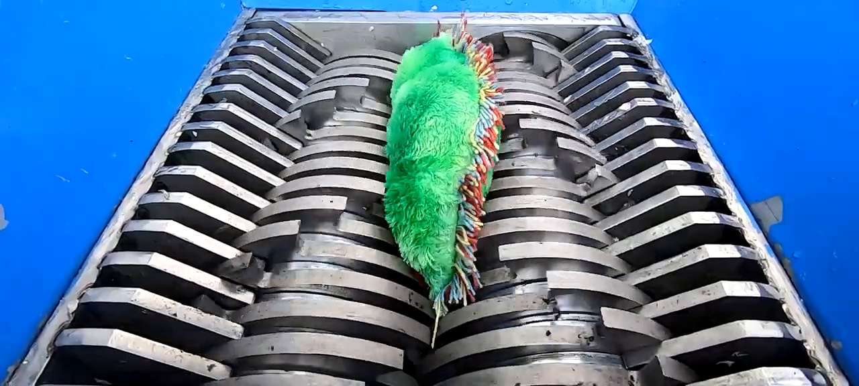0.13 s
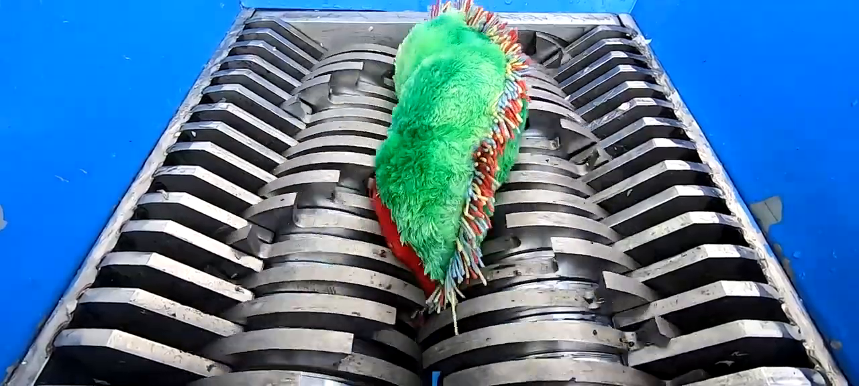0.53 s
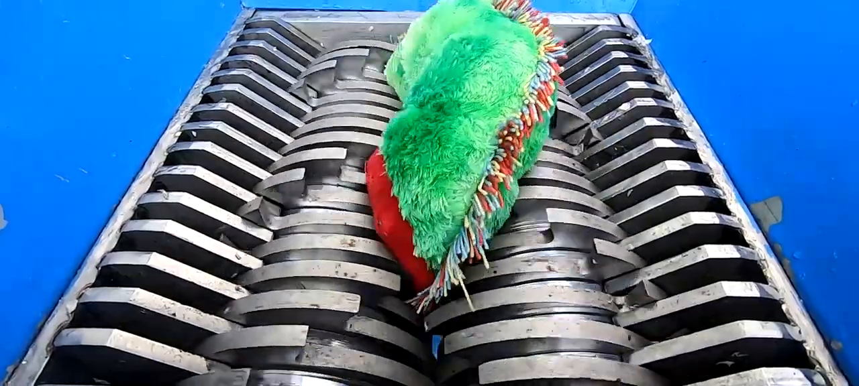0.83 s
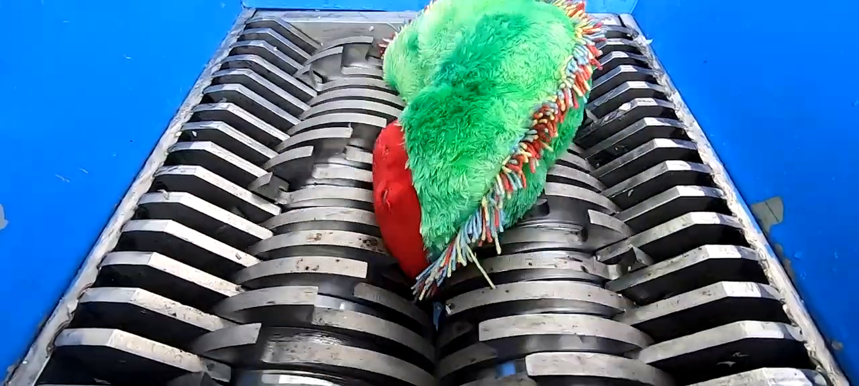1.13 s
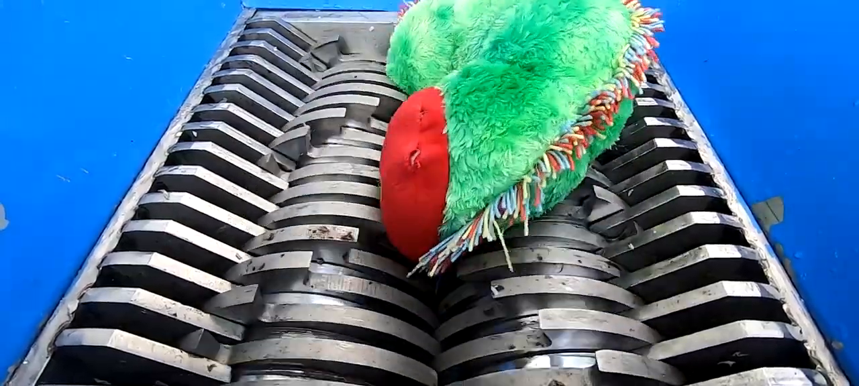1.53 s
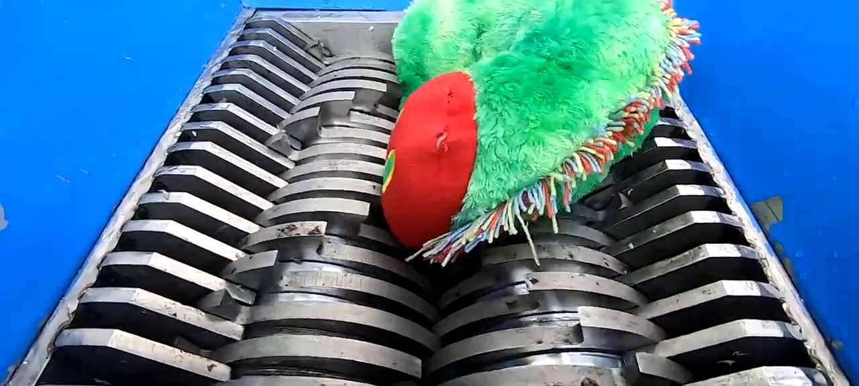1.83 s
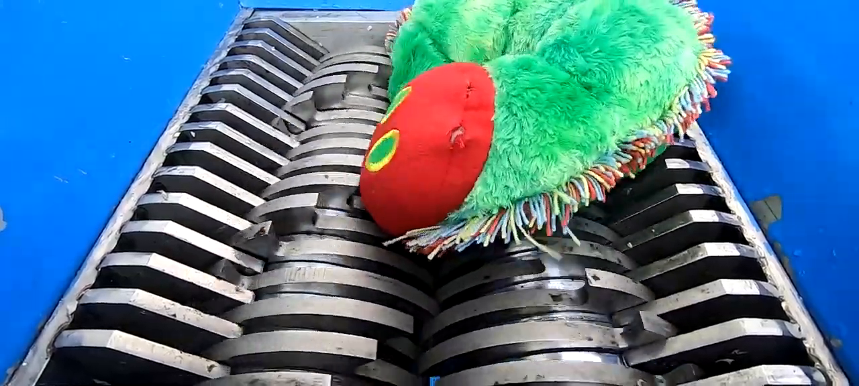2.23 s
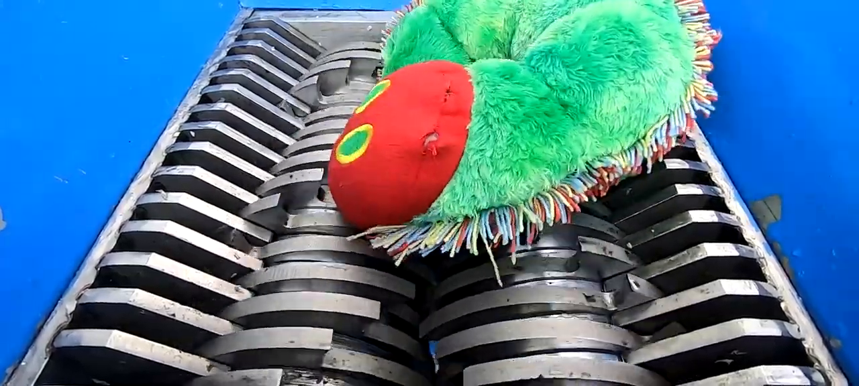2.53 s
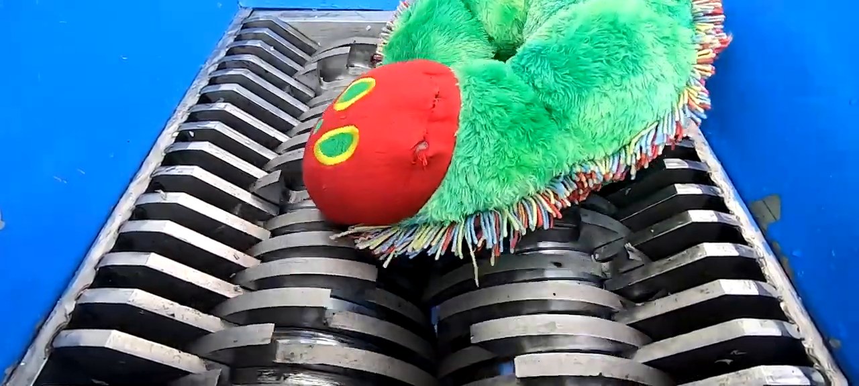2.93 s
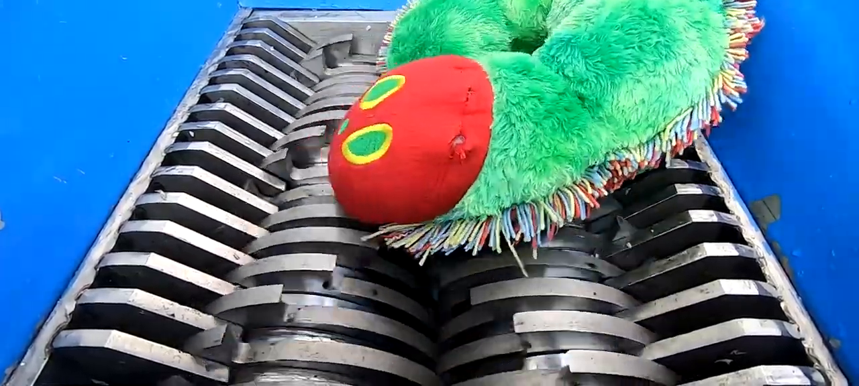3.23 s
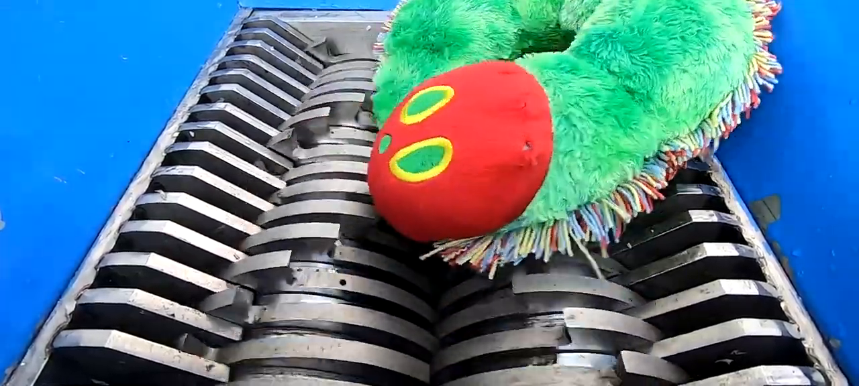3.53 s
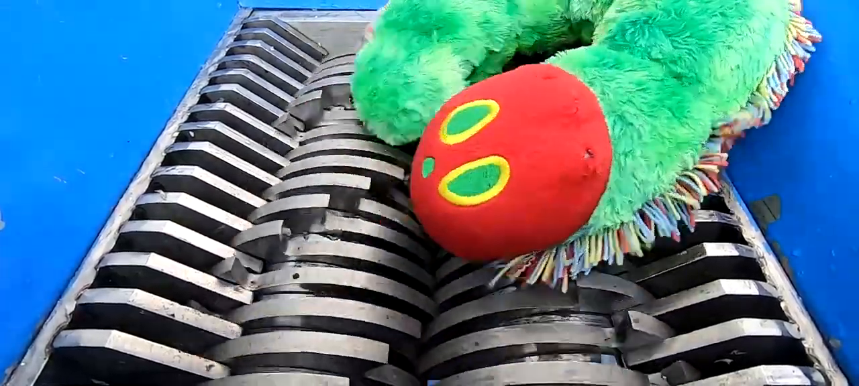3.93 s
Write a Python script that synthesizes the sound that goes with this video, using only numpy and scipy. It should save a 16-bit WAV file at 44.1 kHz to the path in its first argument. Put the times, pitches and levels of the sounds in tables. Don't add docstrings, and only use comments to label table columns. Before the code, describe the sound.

Low mechanical rumble of a twin-shaft shredder, with fabric crunches, a groaning surge midway, then heavier metallic knocks over a faint high whine.

```python
import sys
import numpy as np
from scipy import signal
from scipy.fft import rfft, irfft, next_fast_len
from scipy.io import wavfile
from scipy.ndimage import uniform_filter1d, map_coordinates

SR = 44100
rng = np.random.default_rng(int(sys.argv[2]) if len(sys.argv) > 2 else 0)


def attenuation_scalar(level_db):
    decades = np.asarray(level_db, float) / 20
    return 10 ** decades


def store_pcm(level_fs):
    pcm = np.round(np.clip(level_fs, -1, 1) * 32767).astype(np.int16)
    wavfile.write(sys.argv[1], SR, np.atleast_2d(pcm).T)


N = 180501

# t/s, second order f/Hz, second order level/dB, first over second order level/dB
GEAR_MESH = [(0, 69.5, -35, -1), (.36, 67.7, -34, -1.5), (.43, 68, -26, -13), (.64, 68, -29.5, -9.5),
             (1.36, 69.3, -23.5, -13), (1.43, 69.2, -37, 5), (1.5, 69, -22, -10.5), (1.65, 70.2, -35, 3.5),
             (1.88, 69.2, -19, -12), (2.12, 69.3, -17.5, -3.5), (2.3, 67.6, -28.5, -6),
             (2.41, 63.5, -29.5, 4.5), (2.64, 65.3, -29, -12.5), (2.76, 67, -37.5, -4.5),
             (3.2, 70.5, -40, -1), (3.27, 69.4, -25, -11.5), (3.88, 69.3, -31, -10),
             (4.03, 69.3, -28, -14.5)]
# mesh order, level/dB re the first two
UPPER_ORDERS = [(3, -10.5), (4, -12.5), (5, -12.5), (6, -10.5), (7, -15.5), (8, -26), (9, -14)]

# t/s, strain level/dB, bending over twisting level/dB
FRAME_LOAD = [(0, -28.5, 8), (.2, -29, 2.5), (.36, -27, -1.5), (.72, -30.5, -13.5), (.8, -24.5, 9),
              (.94, -33, -4.5), (1.06, -29.5, 1.5), (1.3, -35.5, -6), (1.46, -27.5, -12), (1.54, -21, 4),
              (1.83, -23, 10), (1.92, -24, -3), (2.37, -21.5, 2.5), (2.63, -24, 3.5), (2.71, -35.5, 6.5),
              (3.2, -34, 2), (3.27, -28.5, 9.5), (3.5, -30.5, -2.5)]
# t/s, f/Hz
BEAM_MODE = [(0, 123.5), (1.4, 125.4), (2, 131), (2.6, 138), (2.9, 123.7), (4.1, 124.7)]
# t/s, f/Hz
WALL_MODE = [(0, 155.7), (1.3, 157.4), (1.6, 169.7), (4.1, 167.4)]
# f/Hz, level/dB per Hz
RUMBLE_SPECTRUM = [(12, -22), (20, -22.5), (54, -5), (81, 0.5), (112, -1), (161, -4), (211, -8), (307, -12),
                   (359, -15), (409, -14.5), (620, -19.5), (810, -53.5), (1360, -120)]

# t/s, pressure level/dB, brightness level/dB
DISC_RUB = [(0, -35, 1), (.22, -32, 0.4), (.48, -36, -0.1), (.8, -37, -1), (1.18, -38, -2), (1.5, -37, -2),
            (1.8, -36, -0.4), (1.93, -28.5, 4.5), (2.08, -26, 4), (2.22, -32, 0.8), (2.42, -32.5, -4.5),
            (2.62, -30.5, 0.5), (2.72, -36.5, -1), (3.18, -37, -1), (3.5, -36.5, 1.5), (3.8, -38, 0.5),
            (4.09, -33, 3)]
# t/s, level/dB, high over low plate level/dB, lean (1 swells and stops, -1 fades)
HOOK_STRIKES = [(.069, -54, 5, -0.27), (.368, -37.5, -18, -0.36), (.551, -42, -26, -0.054),
                (.715, -37, -8, 0.41), (.965, -44.5, 5, 0.083), (1.333, -46, -7, 0.56),
                (1.444, -57, 11, .1), (1.539, -37, -7, 0.76), (1.7, -32, -20, .8),
                (1.785, -39.5, -10.5, .3), (1.954, -30, 5, 0.035), (2.131, -31, 5.2, -0.77),
                (2.289, -32, 2, 1), (2.402, -33, -30, -0.51), (2.457, -35.5, -23, -.4),
                (2.619, -47.5, 14, 0.36), (2.765, -30, -7, -0.36), (2.882, -50, 15.5, 1),
                (2.988, -32.5, -1.5, 0.93), (3.161, -26, -2.5, 0.44), (3.278, -28.5, -28, -0.24),
                (3.321, -33, 0, 0.23), (3.343, -28, -1.5, -0.22), (3.534, -22.5, -5, 0.12),
                (3.705, -36, 0.3, -0.046), (3.723, -25, -3.5, -0.07), (3.906, -25.5, -4, 0.28),
                (4.083, -40, -5, 0.023)]
# t/s, crunch level/dB, tick over crunch level/dB, lean
TOOTH_BITES = [(.069, -28, -15, 0.41), (.188, -32, -19, 0.48), (.267, -47.5, -1.5, -0.35),
               (.368, -39.5, 1.5, -.2), (.715, -49, -4.5, 0.032), (.82, -53, 2, 0.13), (1.174, -56, 7, .1),
               (1.333, -62, 9, 0.13), (1.444, -60, 12, 0.0028), (1.545, -42, -2, 0.71),
               (1.785, -45.5, -8, .2), (1.871, -38.5, -25, -0.59), (1.94, -40, -8.5, 0.37),
               (2.131, -36.5, -13.5, -0.62), (2.214, -29.5, -22, 1), (2.302, -36.5, -7, -0.29),
               (2.619, -46, -7.5, 0.45), (2.758, -40, -6, -.2), (2.882, -32.5, -23, .9),
               (2.965, -56, 15, -.3), (2.988, -45, -3, 1), (3.161, -33.5, -20.5, -0.69),
               (3.278, -40.5, -31, -1.5), (3.321, -33, -19.5, -0.25), (3.343, -37.5, -12.5, -0.24),
               (3.389, -33.5, -5.5, 0.91), (3.705, -30.5, -20, 0.034), (3.723, -41, -9.5, -0.092),
               (3.888, -40, -12, 0.15), (4.083, -37, -9.5, -0.22)]
# f/Hz, width/Hz, level/dB
LOW_PLATE_MODES = [(646, 47.6, -6.5), (680.7, 34.5, -1), (769.3, 35.4, -4)]
HIGH_PLATE_MODES = [(1564, 28, 4), (1644, 13, 6), (1200, 7, -6), (2310, 12, -1), (2206, 210, -10.5)]
# f/Hz, level/dB per Hz
SCRAPE_SPECTRUM = [(300, -39), (450, 0.5), (800, 0), (1100, -1), (1500, -7), (2000, -11), (2600, -48.5)]
DUST_SPECTRUM = [(1500, -37.5), (2000, 2.5), (2600, 1.5), (3100, -7), (3600, -7.5), (4100, -4), (4500, -15),
                 (5600, -26), (6300, -44.5), (7500, -38)]

# t/s, level/dB, centre f/Hz, swell/s (below 0 strikes and fades)
FABRIC_LUMPS = [(.04, -38.5, 1300, 0.014), (.075, -37, 1084, 0.01), (.19, -37, 1200, -0.00077),
                (1.59, -36.5, 693, 0.053), (2.04, -20.5, 404, 0.017), (2.222, -26, 870, -0.006),
                (2.393, -20, 560, -.02), (2.638, -26, 420, .012), (2.46, -24, 406, 0.0045),
                (2.642, -22.5, 470, 0.035), (2.887, -27.5, 1130, 0.022), (2.724, -32, 700, 0.012),
                (2.995, -48, 905, -0.019), (3.109, -31.5, 850, -.015)]

# t/s, roar level/dB
SHAFT_GROAN = [
    (1.75, -48),
    (1.768, -29.5),
    (1.818, -57),
    (1.938, -26),
    (2.002, -32.5),
    (2.074, -37.5),
    (2.1, -25),
    (2.2, -33),
    (2.4, -36),
]
# f/Hz, level/dB per Hz
ROAR_SPECTRUM = [(300, -31.0), (450, 8.5), (900, -0.5), (1420, -13), (1570, 7.5), (1720, -11.5),
                 (2300, -9), (2800, -33.5)]

# t/s, level/dB
INVERTER_WHINE = [
    (0, -51),
    (.7, -57),
    (1.75, -58.5),
    (2.25, -55),
    (4.09, -56),
]
# rotor orders off the carrier, level/dB
STRONG_LINES = [(-12.5, -74), (-9.5, -70), (-6.5, -65), (-5.5, -74), (-4.5, -69), (-3.5, -75), (-2.5, -69),
                (-1.5, -60), (-0.5, -71), (0.5, -71), (1.5, -67), (3.5, -74), (4.5, -75), (6.5, -71)]
# f/Hz, level/dB per Hz
HISS_SPECTRUM = [(4450, -30), (4750, -7), (4960, 0), (5200, -6), (5500, -24)]

# t/s, level/dB
SEAM_RIPS = [(0.021, -69), (0.371, -70), (0.819, -72), (1.17, -67.5), (1.55, -71.5), (1.95, -76.5),
             (2.11, -73), (2.29, -72.5), (2.56, -71.5), (2.88, -70)]
# f/Hz, level/dB per Hz
FIBRE_SPECTRUM = [(3000, -31), (4300, 0.5), (4700, 11.5), (5500, 6), (6000, -2.5), (6600, -2), (7300, -8)]

# level/dB at rest, dB per dB of pressure, dB per dB of brightness
RUMBLE_RUB = (-33.5, 0.52, 0)
LOW_RUB, HIGH_RUB = (-41.5, 1.2, -.5), (-48, 1.1, 1.5)
SCRAPE_RUB, DUST_RUB = (-44, 0.89, .3), (-52.5, 0.51, .8)
FIBRE_RUB = (-74, .3, .6)


def unit(x):
    return x / np.sqrt(np.mean(x ** 2) + 1e-20)


def along(points, hz):
    f, v = np.transpose(points)
    return np.interp(np.log(hz + 1), np.log(f + 1), v, left=-120, right=-120)


def curves(rows):
    s, *cols = np.transpose(rows)
    return [np.interp(np.arange(N) / SR, s, c) for c in cols]


def wobble(rate):
    knots = rng.standard_normal(int(N * 200 / SR) + 4)
    return map_coordinates(knots, [np.arange(N) * min(rate, 199) / SR])


def filtered(x, response):
    m = next_fast_len(N + 8192)
    return irfft(rfft(x, m) * response(np.fft.rfftfreq(m, 1 / SR)), m)[:N]


def coloured(x, spectrum):
    return unit(filtered(x, lambda hz: attenuation_scalar(along(spectrum, hz))))


def rung(x, modes):
    def response(f):
        total = 0
        for k, (centre_hz, width_hz, db) in enumerate(modes):
            damping = 1j * f * width_hz
            total = total + (-1) ** k * attenuation_scalar(db) * damping / (centre_hz ** 2 - f * f + damping)
        return total
    return unit(filtered(x, response))


def grit(rough_db, rate):
    return rng.standard_normal(N) * attenuation_scalar(rough_db * wobble(rate))


def tone(hz, stray_hz, rough_db, rate):
    turn = 2 * np.pi * np.cumsum(hz + stray_hz * wobble(rate)) / SR
    return unit(attenuation_scalar(rough_db * wobble(rate)) * np.sin(turn))


def rubbing(rest_db, by_pressure, by_brightness):
    pressure_db, bright_db = curves(DISC_RUB)
    rub_rest_db = -37
    return rest_db + by_pressure * (pressure_db - rub_rest_db) + by_brightness * bright_db


def gears():
    hz, second_db, limp_db = curves(GEAR_MESH)
    second_db = second_db - 1.0
    first_db = second_db + limp_db
    turn = np.pi * np.cumsum(hz + 1.28 * wobble(26)) / SR
    second = attenuation_scalar(second_db + 1.8 * wobble(33)) * np.cos(2 * turn)
    first = attenuation_scalar(first_db + 2.0 + 1.7 * wobble(34)) * np.cos(turn)
    load_db = (first_db + second_db) / 2
    sharp_db = load_db + 0.23 * (load_db + 21)
    upper = np.zeros(N)
    for order, db in UPPER_ORDERS:
        upper += attenuation_scalar(db + 2.6 * wobble(22)) * np.cos(order * turn + 0.74 * wobble(12))
    return -np.sqrt(2) * (first + second + attenuation_scalar(sharp_db) * upper)


def frame():
    strain_db, bend_db = curves(FRAME_LOAD)
    strain_rest_db, rumble_by_strain = -30, 0.42
    beam_db = strain_db + bend_db / 2 - 6.5
    wall_db = strain_db - bend_db / 2 - 6.0
    rumble_db = rubbing(*RUMBLE_RUB) + rumble_by_strain * (strain_db - strain_rest_db)
    beam = attenuation_scalar(beam_db) * tone(*curves(BEAM_MODE), stray_hz=3, rough_db=1.5, rate=25)
    wall = attenuation_scalar(wall_db) * tone(*curves(WALL_MODE), stray_hz=4.75, rough_db=1.0, rate=25)
    brace = attenuation_scalar(rumble_db - 11.0) * tone(230, stray_hz=4, rough_db=5.5, rate=16)
    rumble = attenuation_scalar(rumble_db + 4.5) * coloured(grit(rough_db=1.4, rate=40), RUMBLE_SPECTRUM)
    return beam + wall + brace + rumble


def bites(events, life_s):
    power = np.zeros((2, N + SR))
    t = np.arange(-SR // 8, SR // 8) / SR
    for s, db, high_db, lean in events:
        spread_s = np.array(life_s)[:, None] * np.exp(-1.3 * lean * np.sign(t))
        shape = np.exp(-(np.abs(t) / spread_s) ** 1.3)
        at = round(s * SR) + SR // 4
        power[:, at:at + len(t)] += (attenuation_scalar([[db], [db + high_db]]) * shape) ** 2
    soft = uniform_filter1d(np.sqrt(power), size=90, axis=1)
    return uniform_filter1d(soft, size=90, axis=1)[:, 3 * SR // 8:][:, :N]


def hum(hz):
    return np.sqrt(2) * np.sin(2 * np.pi * np.cumsum(hz + 0.01096 * hz * wobble(40)) / SR)


def cutters():
    low_db, scrape_db = rubbing(*LOW_RUB), rubbing(*SCRAPE_RUB)
    high_db, dust_db = rubbing(*HIGH_RUB), rubbing(*DUST_RUB)
    low, high = bites(HOOK_STRIKES, [.013, .011])
    crunch, tick = bites(TOOTH_BITES, [.011, .004])
    drag = attenuation_scalar(-14) * bites(HOOK_STRIKES, [.035, .035])[0]
    slip_db = 1.1 * wobble(22.06)

    low_rub = (attenuation_scalar(low_db - 4.5 + slip_db) + drag) * rung(grit(rough_db=1.0, rate=56), LOW_PLATE_MODES)
    high_rub = attenuation_scalar(high_db - 6.5 + slip_db) * rung(grit(rough_db=5.0, rate=50), HIGH_PLATE_MODES)
    low_clang = 0.69 * hum(660) + 0.4 * hum(715) + 0.29 * rung(rng.standard_normal(N), LOW_PLATE_MODES)
    high_clang = 0.39 * hum(1550) + 0.3 * hum(1630)
    high_clang = high_clang + 0.39 * rung(rng.standard_normal(N), HIGH_PLATE_MODES)
    plates = low_rub + high_rub + low * low_clang + high * high_clang
    plates = filtered(plates, lambda hz: 1 / (1 + (hz / 2900) ** 6))

    scrape_level = attenuation_scalar(scrape_db + 2.0 + slip_db) + 0.58 * crunch + 0.53 * drag
    scrape = scrape_level * coloured(grit(rough_db=0.5, rate=90), SCRAPE_SPECTRUM)
    dust_level = attenuation_scalar(dust_db - 1.24 + slip_db) + 0.69 * tick + 0.13 * drag
    dust = dust_level * coloured(grit(rough_db=0.5, rate=360), DUST_SPECTRUM)
    return plates + scrape + dust


def lumps():
    out, t = np.zeros(N + SR), np.arange(SR // 8) / SR
    hz = np.fft.rfftfreq(len(t), 1 / SR) + 1
    for s, db, centre_hz, swell_s in FABRIC_LUMPS:
        colour = attenuation_scalar(-15 * np.log2(hz / centre_hz) ** 2) + attenuation_scalar(-59)
        noise = rng.standard_normal(len(t))
        burst = attenuation_scalar(db) * unit(irfft(rfft(noise) * colour, len(t)))
        shape = np.exp(-t / abs(swell_s)) * (1 - np.exp(-t / .0015))
        start = round(s * SR) + SR // 2
        if swell_s > 0:
            start -= len(t)
            shape = shape[::-1]
        out[start:start + len(t)] += burst * shape
    return out[SR // 2:][:N]


def groan():
    s, roar_db = np.transpose(SHAFT_GROAN)
    ring_db = -34.5 + 2.5 * (roar_db + 26)

    def envelope(db):
        level = np.interp(np.arange(N) / SR, s, attenuation_scalar(db), left=0, right=0)
        return uniform_filter1d(level, size=900)

    ring = envelope(ring_db) * tone(1328, stray_hz=14, rough_db=0.0, rate=64)
    roar = envelope(roar_db) * coloured(grit(rough_db=-1.0, rate=70), ROAR_SPECTRUM)
    return 0.78 * ring + 0.63 * roar


def inverter():
    t = np.arange(N) / SR
    carrier_hz, rotor_hz = 5000.6, 24.9
    comb_db, fall_db_per_order, fade_db = -73, .75, 1.8
    comb = {k + .5: comb_db - fall_db_per_order * abs(k + .5) for k in range(-14, 14)}
    comb.update(dict(STRONG_LINES))
    lines = np.zeros(N)
    for order, db in comb.items():
        level = attenuation_scalar(db + fade_db * wobble(4))
        turns = (carrier_hz + order * rotor_hz) * t + 0.083 * wobble(5) + rng.random()
        lines += level * np.sin(2 * np.pi * turns)
    hiss = attenuation_scalar(-8.5) * coloured(rng.standard_normal(N), HISS_SPECTRUM)
    whine_db = curves(INVERTER_WHINE)[0] - 0.8 * wobble(2.7)
    return attenuation_scalar(whine_db) * unit(unit(lines) + hiss)


def fibres():
    t = np.arange(N) / SR
    rip_s = .025
    rips = sum(attenuation_scalar(db) * np.exp(-np.abs(t - s) / rip_s) for s, db in SEAM_RIPS)
    steady = attenuation_scalar(rubbing(*FIBRE_RUB) + 1.5 * wobble(6))
    return attenuation_scalar(3.5) * (steady + rips) * coloured(grit(rough_db=1.5, rate=130), FIBRE_SPECTRUM)


def scene():
    mix = gears() + frame() + cutters() + lumps() + groan() + inverter() + fibres()
    return mix[None]


def top_cut(x):
    return signal.sosfilt(signal.butter(12, 7180, fs=SR, output="sos"), x)


def record(dry):
    t = np.arange(N) / SR
    mirror_hz, top_hz = 12000, 7200
    x = dry[0] / (1 + np.abs(dry[0] / .62) ** 4) ** (1 / 4)
    upper = filtered(x, lambda hz: hz > top_hz / 2)
    image = attenuation_scalar(-14.5) * np.cos(2 * np.pi * mirror_hz * t) * upper
    x = filtered(x + image, lambda hz: attenuation_scalar(-.13 * np.clip(hz - top_hz, 0, 800)))
    x = x * np.clip((N + 40 - np.arange(N)) / 200, 0, 1)
    x = x + attenuation_scalar(-101) * rng.standard_normal(N)
    return top_cut(x[None])


dry = scene()
out = record(dry)
store_pcm(out)
```